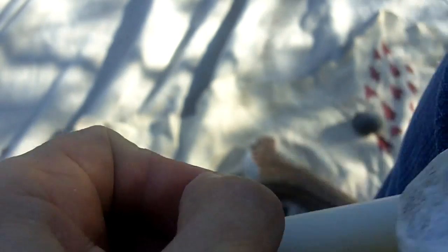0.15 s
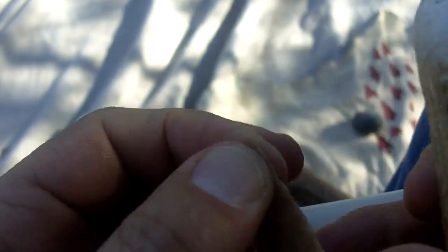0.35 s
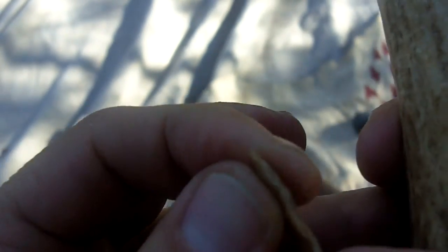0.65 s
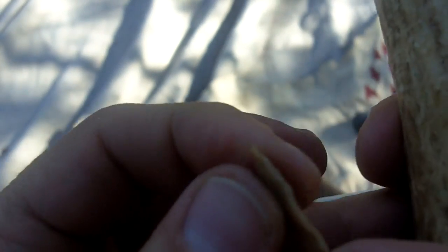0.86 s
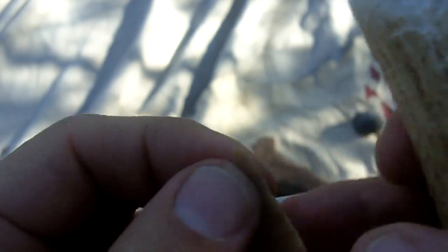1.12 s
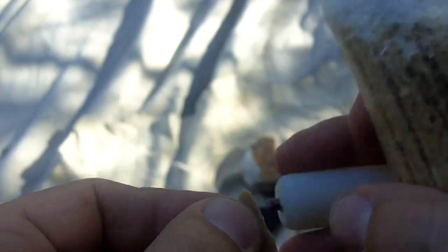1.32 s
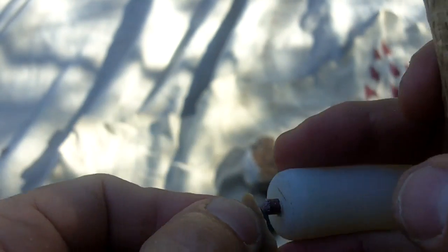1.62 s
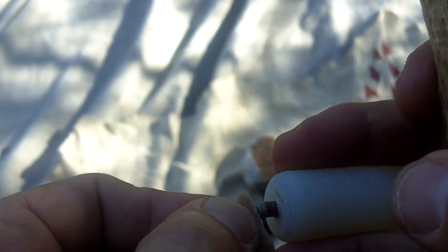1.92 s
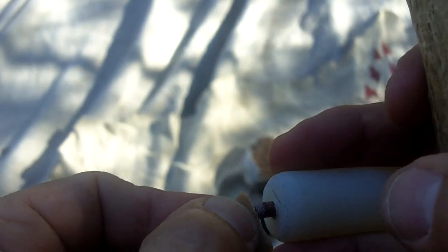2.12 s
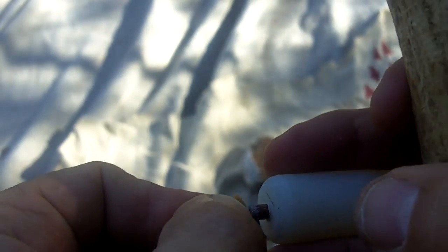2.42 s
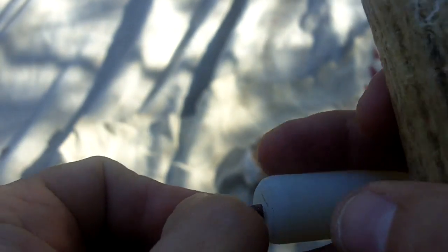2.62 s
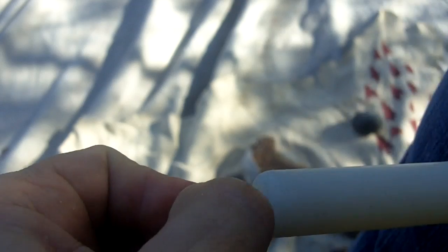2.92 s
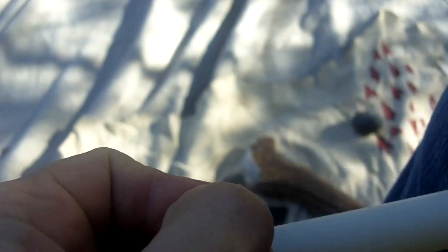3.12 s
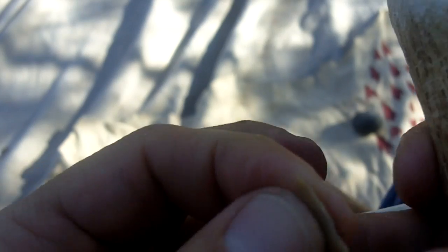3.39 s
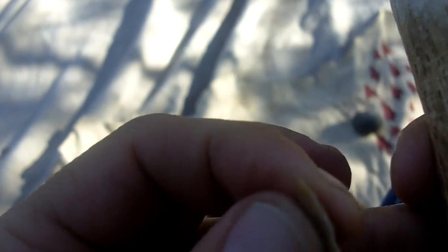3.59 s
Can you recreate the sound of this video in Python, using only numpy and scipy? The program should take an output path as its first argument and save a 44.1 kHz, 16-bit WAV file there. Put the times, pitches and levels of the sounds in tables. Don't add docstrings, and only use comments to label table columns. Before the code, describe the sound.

At 0.2 s an antler tool hits a punch on stone: a very loud, clipped, bright click with a short gritty rattle and faint slap echoes; the background dips briefly. Soft open air follows, with faint far-off birds warbling and trilling from 0.5 s. Low wind buffeting grows after 1.1 s, strongest around 2-2.9 s. At 3.07 s a second click lands with a quick bounce, rattle and echoes; wind continues to about 3.75 s.

```python
import sys
import numpy as np
from scipy import signal
from scipy.fft import rfft, irfft, next_fast_len
from scipy.io import wavfile
from scipy.ndimage import uniform_filter1d, map_coordinates

SR = 44100
rng = np.random.default_rng(int(sys.argv[2]) if len(sys.argv) > 2 else 0)


def level_to_linear(level):
    exponent = np.asarray(level, float) / 20
    return 10 ** exponent


def inscribe(sig):
    pcm = np.round(np.clip(np.atleast_2d(sig).T, -1, 1) * 32767)
    wavfile.write(sys.argv[1], SR, pcm.astype(np.int16))


N = 165375

# (time [s], rattle level [dB], decay t60 [ms])
BLOWS = [
    (.1936, -18, 56),
    (3.0672, -18.5, 62),
]
# (level [dB], decay t60 [ms])
WOODS = [
    (-8.5, 83),
    (3, 140),
]


def unit(x):
    return x / np.sqrt(np.mean(x ** 2) + 1e-20)


def along(points, hz):
    f, v = np.transpose(points)
    return np.interp(np.log(hz + 1), np.log(f + 1), v)


def wobble(rate):
    knots = rng.standard_normal(int(N * rate / SR) + 4)
    return map_coordinates(knots, [np.arange(N) * rate / SR])


def filtered(x, response):
    m = next_fast_len(x.shape[-1] + 8192)
    return irfft(rfft(x, m) * response(np.fft.rfftfreq(m, 1 / SR)), m)[..., :x.shape[-1]]


def rush(spectrum, alike, size=N):
    def mid_side(hz):
        turn = np.arccos(np.clip(along(alike, hz), -1, 1)) / 2
        return level_to_linear(along(spectrum, hz)) * [np.cos(turn), np.sin(turn)]

    mid, side = filtered(rng.standard_normal((2, size)), mid_side)
    return unit(np.array([mid + side, mid - side]))


def add(out, s, x):
    part = out[..., round(s * SR):][..., :x.shape[-1]]
    part += x[..., :part.shape[-1]]


def fade(t60_ms, size):
    return level_to_linear(-60e3 * np.arange(size) / SR / t60_ms)


def open_air():
    # (frequency [Hz], level [dB per Hz])
    air_spectrum = [(59, -25.5), (100, 0.5), (343, -6.5), (910, -7), (1680, -13.5), (2370, -15),
                    (3320, -17.5), (14700, -26), (16000, -35.5)]
    # (frequency [Hz], correlation [-1 to 1])
    air_alike = [(100, 0.57), (600, 0.72), (1400, .8), (4000, 0.72), (8000, 0.8), (15000, 1)]
    level_db = -53 + 0.53 * wobble(3.9)
    return level_to_linear(level_db) * rush(air_spectrum, air_alike)


def wind():
    # (time [s], level [dB])
    course = [(0, -56.5), (1.08, -53.5), (1.15, -37), (1.33, -50.5), (1.57, -55.5), (1.63, -41),
              (1.85, -38.5), (2.0, -39), (2.099, -31.5), (2.3, -34), (2.38, -39), (2.56, -35), (2.64, -38),
              (2.85, -29), (3.0, -43), (3.27, -55.5), (3.32, -36.5), (3.75, -39)]
    # (time [s], lift [dB])
    gusts = [(.51, 11), (1.62, 3.5), (1.71, 1), (1.865, 10.5), (1.96, 7), (2.102, 7.5), (2.165, 4),
             (2.30, 3.5), (2.465, 5), (2.56, 8), (2.79, 3), (3.17, 9), (3.33, 3), (3.40, 4.5), (3.48, 8),
             (3.56, 6)]
    # (frequency [Hz], level [dB per Hz])
    buffet_spectrum = [(8.8, -30.5), (15, 8.5), (46, 0.5), (139, -27), (173, -33), (400, -46.5), (520, -69),
                       (880, -120)]
    gust_s, even_s = 0.021, .06
    lump_rate, shared_db, own_db, pan_db = 24, 2, 2, 0.5

    t = np.arange(N) / SR
    own = np.array([wobble(lump_rate), wobble(lump_rate)])
    lumps = level_to_linear(shared_db * wobble(lump_rate) + own_db * own)
    rumble = rush(buffet_spectrum, [(30, .78)])
    power = uniform_filter1d((rumble ** 2).mean(0), round(even_s * SR))
    rumble = rumble / np.sqrt(np.abs(power) + .05)
    shoves = sum(lift_db * np.exp(-((t - at) / gust_s) ** 2) for at, lift_db in gusts)
    s, db = np.transpose(course)
    pan = pan_db * np.array([[1], [-1]])
    return unit(lumps * rumble) * level_to_linear(np.interp(t, s, db) + shoves + 1.5 + pan)


def whistle(notes, wet_db, t60_ms, trill=0):
    waver_db, waver_rate, trill_hz = 2, 60, 70
    out = np.zeros(N)
    for s, length, from_hz, to_hz, db in notes:
        u = np.linspace(0, 1, round(length * SR))
        phase = 2 * np.pi * np.cumsum(from_hz + (to_hz - from_hz) * u) / SR
        add(out, s, level_to_linear(db + 11) * np.sin(np.pi * u) ** 0.48 * np.sin(phase))
    flutter = np.sin(2 * np.pi * trill_hz * np.arange(N) / SR + 2 * wobble(60))
    out = out * level_to_linear(waver_db * wobble(waver_rate)) * (1 + trill * flutter)
    tail = rng.standard_normal((2, SR // 4)) * fade(t60_ms, SR // 4)
    tail = tail / np.linalg.norm(tail[0])
    return out + level_to_linear(wet_db) * signal.fftconvolve(out[None], tail, axes=1)[:, :N]


def far_bird():
    # (time [s], level [dB])
    phrases = [(.53, -59), (1.177, -60), (1.809, -60), (2.576, -58), (3.348, -59.5)]
    # (delay [s], length [s], start [Hz], end [Hz], level [dB])
    phrase = [(0, 0.0195, 4400, 4130, -3), (0.013, 0.0127, 4150, 3550, -2.5),
              (0.023, 0.019, 3600, 3700, 1.5), (0.046, .038, 3750, 3666, -9.5),
              (0.087, .015, 4050, 3380, 2.5), (.099, 0.0143, 3450, 3710, -2), (.062, 0.055, 2830, 2810, -9),
              (.12, .06, 2820, 2780, -9)]
    notes = []
    for s, db in phrases:
        for delay, length, from_hz, to_hz, note_db in phrase:
            notes.append((s + delay, length, from_hz, to_hz, db - 8.5 + note_db))
    return whistle(notes, *WOODS[1], trill=.7)


def near_bird():
    # (time [s], pitch [Hz], level [dB], fall [Hz], rising note level [dB])
    pairs = [(.615, 2320, -71, 50, -8), (.685, 2360, -60.5, 80, -8), (.768, 2380, -64.5, 151, 1.5),
             (.839, 2340, -62, 80, 2), (.915, 2443, -61.5, 330, -4), (1.001, 2480, -64, 350, 1),
             (1.075, 2370, -62, 79, -1), (1.55, 2450, -67.5, 202, -1), (1.621, 2470, -63, 216, -1.5),
             (1.703, 2515, -60, 230, -1), (1.79, 2500, -61, 250, -3), (1.87, 2440, -67, 278, 1)]
    # (time [s], length [s], start [Hz], end [Hz], level [dB])
    strays = [(1.948, 0.026, 1640, 1766, -59.5), (2.186, 0.027, 2410, 2680, -60.5),
              (2.213, 0.019, 2900, 3230, -63), (2.431, 0.027, 2890, 2070, -62.5),
              (2.37, .03, 2200, 2400, -69.5), (2.745, 0.032, 2900, 1910, -62.5),
              (3.584, .03, 2490, 1900, -67)]
    rise, rise_s, fall_s = 1.1, 0.0212, 0.032
    notes = []
    for s, hz, db, fall_hz, rise_db in pairs:
        notes.append((s, rise_s, hz / rise ** 0.39, hz * rise, db + rise_db))
        notes.append((s + rise_s, fall_s, hz, hz - fall_hz, db))
    for s, length, from_hz, to_hz, db in strays:
        notes.append((s, length, from_hz, to_hz, db - 5))
    return whistle(notes, *WOODS[0])


def walls(sent):
    # (delay [s], slap level [dB], smear level [dB], smear t60 [ms])
    echoes = [(.0548, -42.5, -43, 70), (.081, -50, -47, 35), (.095, -50, -45, 100), (.127, -56, -49, 50),
              (.136, -50, -50, 50), (.02, -71, -42, 350)]
    # (frequency [Hz], level [dB])
    far_spectrum = [(700, -25), (1300, 0), (2200, -2), (3000, -3), (3800, 1), (4400, -3), (5600, -14),
                    (8000, -38.5)]
    paths, n = np.zeros((2, SR)), SR // 3
    impulse = np.arange(SR // 100) == SR // 500
    slap = filtered(impulse, lambda hz: level_to_linear(along(far_spectrum, hz)))
    for delay, slap_db, smear_db, t60 in echoes:
        add(paths, delay - .002, level_to_linear(slap_db) * slap / np.linalg.norm(slap))
        smear = rush(far_spectrum, [(1000, 0.59)], size=n) * fade(t60, n)
        add(paths, delay, level_to_linear(smear_db) * smear / np.linalg.norm(smear[0]))
    return signal.fftconvolve(sent.mean(0)[None], paths, axes=1)[:, :N]


def crack_and_rattle():
    # (frequency [Hz], level [dB per Hz])
    crack_spectrum = [(500, -24), (3000, -8.5), (6500, -5), (8500, -12.5), (11000, -2.5), (15000, -5)]
    # (frequency [Hz], level [dB per Hz])
    rattle_spectrum = [(88, -30.5), (150, -15.5), (291, -11), (2500, -5.5), (3350, -0.5), (4670, -7),
                       (5360, -13.5), (13200, -24.5), (16000, -46)]
    crack_db, crack_t60_ms = -1.5, 4.5
    bright_hz, bright_life = 6500, .9
    out, n = np.zeros((2, N)), SR // 8
    for s, db, t60 in BLOWS:
        crack = rush(crack_spectrum, [(1000, 0.83)], size=n)
        add(out, s, level_to_linear(crack_db) * fade(crack_t60_ms, n) * crack)
        grit = level_to_linear(2.3 * wobble(400)[:n])
        noise = rush(rattle_spectrum, [(1000, 0.29)], size=n)
        dull = filtered(noise, lambda hz: 1 / (1 + (hz / bright_hz) ** 8))
        bright = (noise - dull) * 2 * fade(t60 * bright_life, n)
        add(out, s, level_to_linear(db) * grit * (dull * fade(t60, n) + bright))
    return out


def ringing():
    # (time [s], level [dB], time until choked [ms], choke [dB])
    contacts = [
        (.1935, 4.5, 3.6, -12.5),
        (3.0671, 5, 2.86, -9),
        (3.0838, -1, 1.9, -18.5),
        (.2046, -15, 3.5, -10),
        (3.0795, -14, 3, -11.5),
        (3.0718, -14, 3.5, -11.5),
        (3.6, -41, 1.5, -12),
        (.2022, -20, 4.5, -8),
        (.2172, -29, 3, -8),
        (.2238, -33, 3, -8),
    ]
    # (frequency [Hz], level [dB], rise [ms], t60 [ms], left-right [dB])
    first, second = [(200.7, -27, .3, 14, 0.5), (788, -21, 0.31, 29, -0.5), (1635, -12.5, 0.82, 14, -0.5),
                     (2390, -8, .5, 12, 0), (2820, -4, .6, 13, -0.5), (3205, -1, 0.45, 10, 0),
                     (3644, -10.5, 0.45, 18, -1), (4640, -18, .4, 14, 0), (5605, 6.5, 2.1, 11.9, -9.5),
                     (7730, -14, .1, 6, -1.5), (9860, -7.5, .1, 5, -1), (11070, -3, .1, 4.3, -2.5),
                     (12990, -5.5, .14, 3.5, -3), (14700, -6.5, .1, 2.5, -1)], [(330, -25, .3, 20, 1), (787, -23.5, 0.25, 24, -5),
                                     (1140, -13, 0.45, 16, -3.5), (1446, -6.5, .4, 18, -5),
                                     (2310, -8.5, .4, 12, 0), (2890, 3.5, 0.45, 7.7, 2),
                                     (3407, -5, .4, 16, 1.5), (3894, -3.5, 0.37, 10.7, 2),
                                     (5668, -2.5, 0.78, 10, -7), (6840, -8.5, 0.092, 6, -2),
                                     (8020, -16, .1, 8, -1.5), (10550, -2, .2, 3.2, 1.5),
                                     (12850, -5, 0.11, 3.9, -5), (14500, -12, .1, 2.5, -3)]
    bounce, tap, flake = [(486, -24, 0.65, 12, -3), (2000, 4, 1.4, 15, -5), (3500, -2.5, 1.4, 17, -4),
                          (5200, -15, .8, 8, -3), (7600, -27, .3, 5, -2), (10200, -23.5, .3, 5.5, -2.5)], [(3280, 0, 2.2, 22, 0), (5500, -6, 1.2, 16, -2)], [(5500, 0, 1.5, 22, -6), (3700, -7, 1.2, 18, -1)]
    modes = [first, second, bounce, tap, tap, tap, second, flake, flake, flake]
    choke_ms = 0.27
    out, n = np.zeros((2, N)), SR // 8
    ms = np.arange(n) / SR * 1e3
    for (s, db, grip_ms, choke_db), ring in zip(contacts, modes):
        gripped = 1 / (1 + np.exp(np.clip((grip_ms - ms) / choke_ms, -30, 30)))
        for hz, level, rise, t60, pan in ring:
            tone = np.sin(2 * np.pi * hz * ms / 1e3) * fade(t60, n)
            tone *= (1 - np.exp(-(ms / rise) ** 2)) * level_to_linear(choke_db * gripped)
            add(out, s, level_to_linear(db + level + np.array([[pan / 2], [-pan / 2]])) * tone)
    return out


def gain_dip():
    duck_db, after_s, fall_s, back_s = -6.5, .005, 0.052, 0.33
    t = np.arange(N) / SR
    corners = np.cumsum([0, fall_s, back_s])
    return level_to_linear(sum(np.interp(t - s - after_s, corners, [0, duck_db, 0]) for s, _, _ in BLOWS))


def scene():
    background = gain_dip() * (open_air() + far_bird() + near_bird())
    rings, noise = ringing(), crack_and_rattle()
    echoes = walls(.35 * rings + noise)
    return rings + noise + echoes + wind() + background


def band_limit(x):
    return signal.sosfilt(signal.butter(12, 16570, fs=SR, output="sos"), x)


def record(dry):
    offset = [
        [.0388],
        [.0086],
    ]
    top_hz = 15500
    clipped = np.clip(dry + offset, -1, 1)
    mix = filtered(clipped, lambda hz: np.clip((top_hz - hz) / 250 + .5, 0, 1) ** 2)
    return band_limit(mix)


dry = scene()
out = record(dry)
inscribe(out)
```